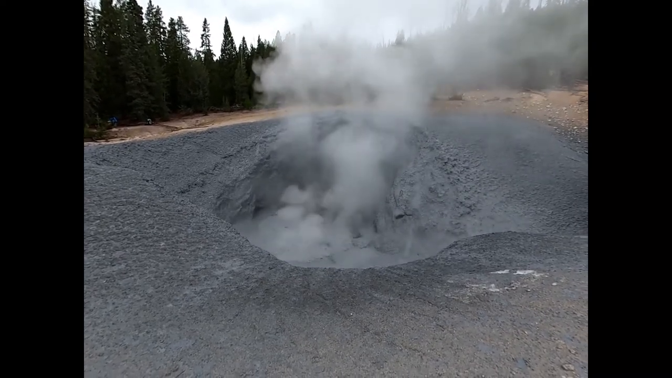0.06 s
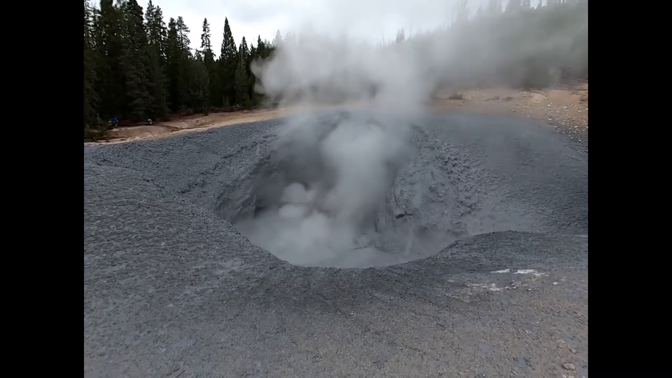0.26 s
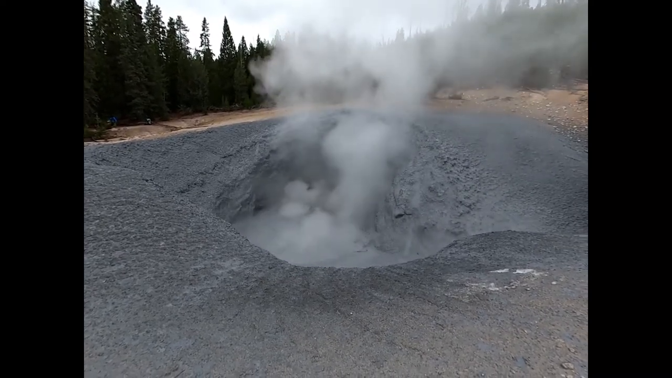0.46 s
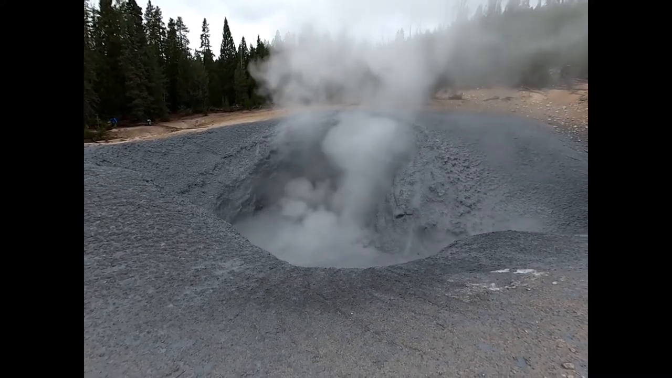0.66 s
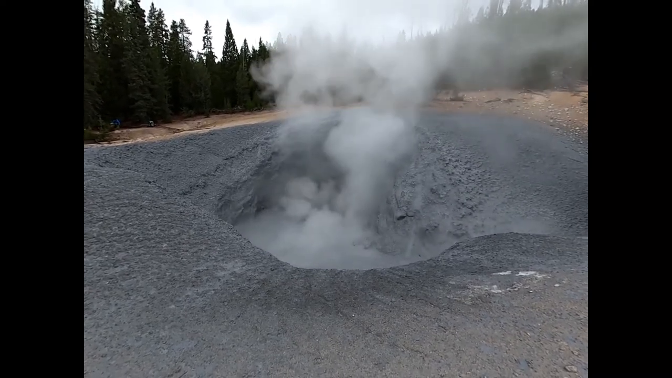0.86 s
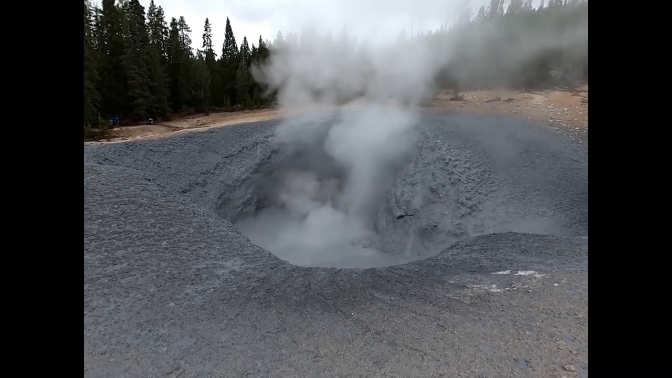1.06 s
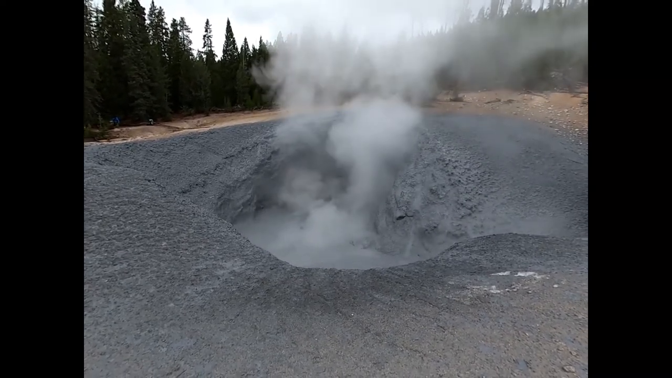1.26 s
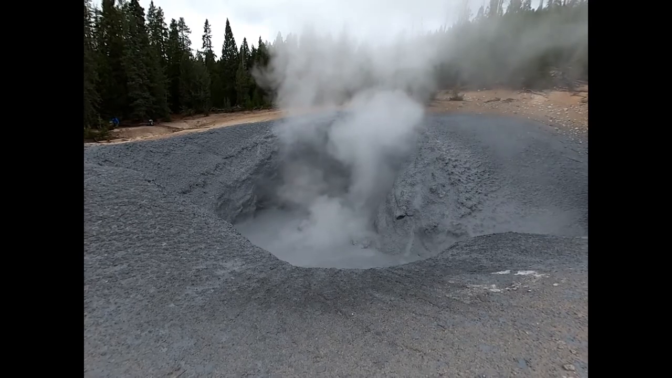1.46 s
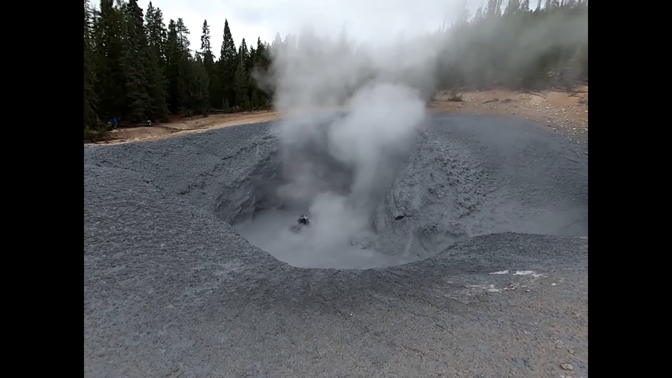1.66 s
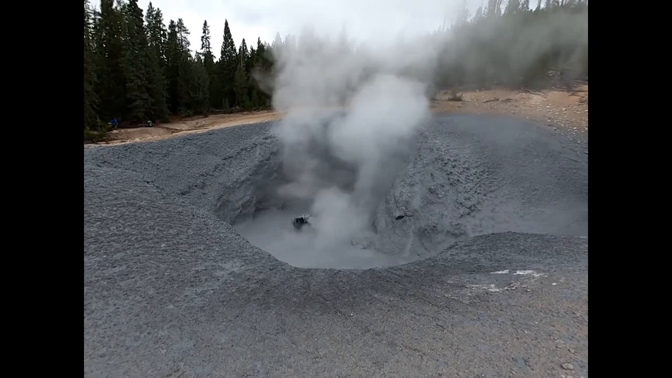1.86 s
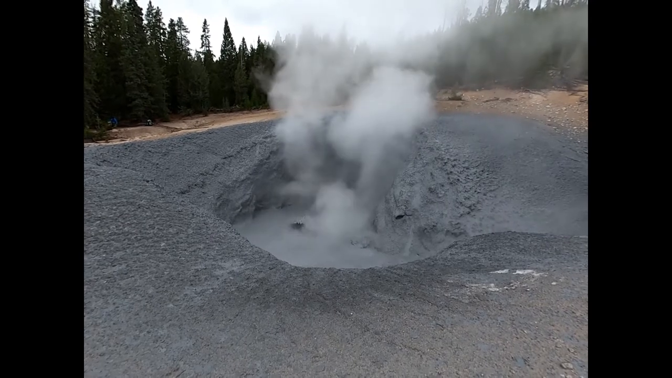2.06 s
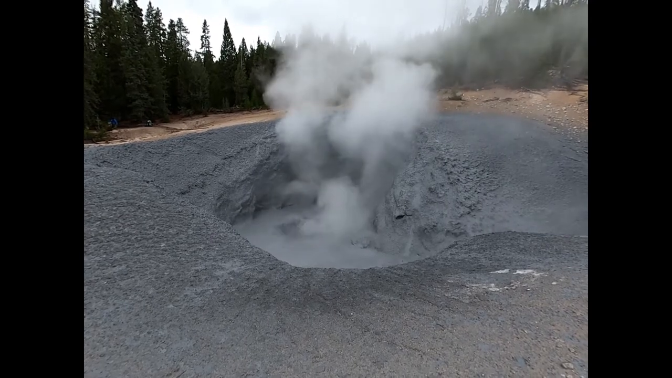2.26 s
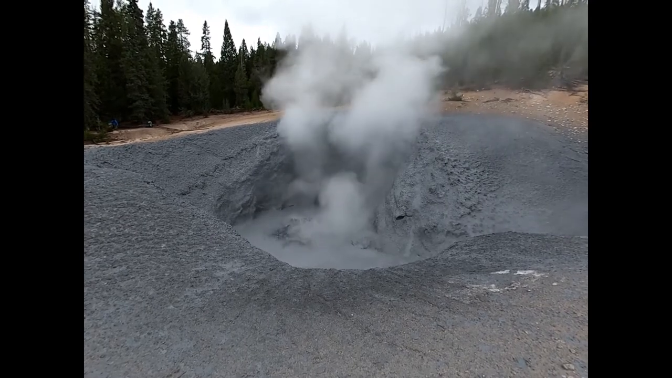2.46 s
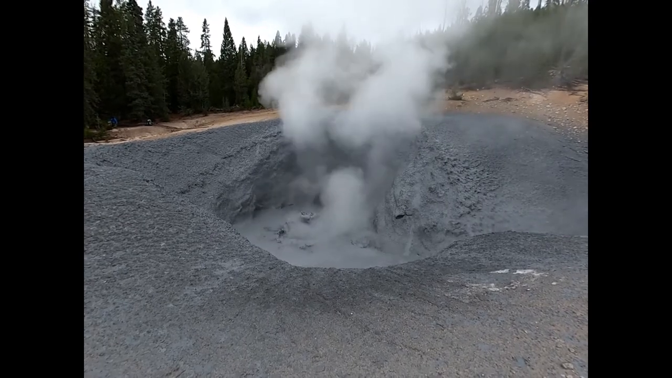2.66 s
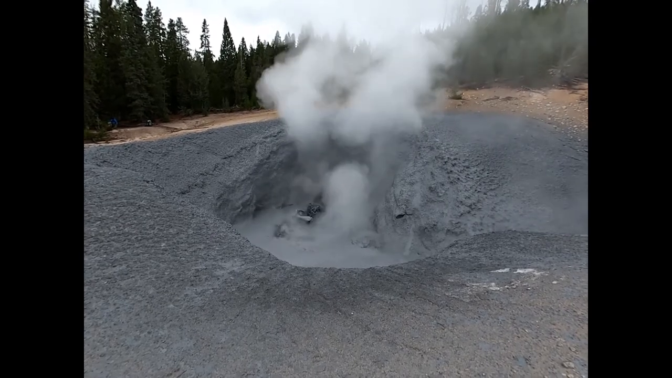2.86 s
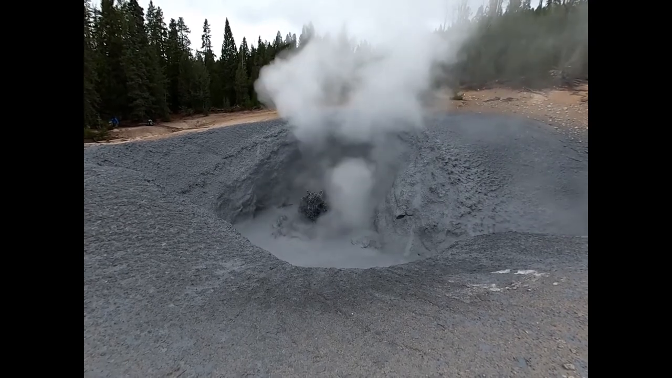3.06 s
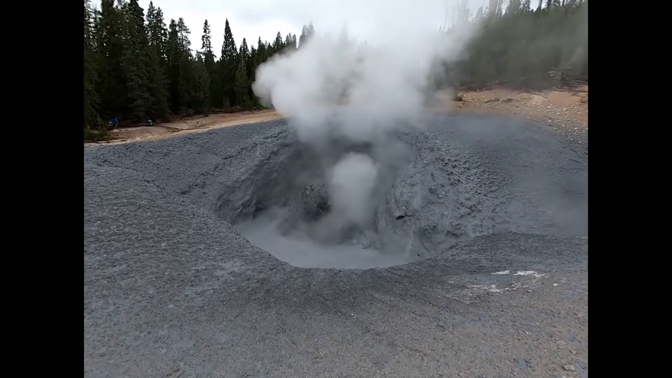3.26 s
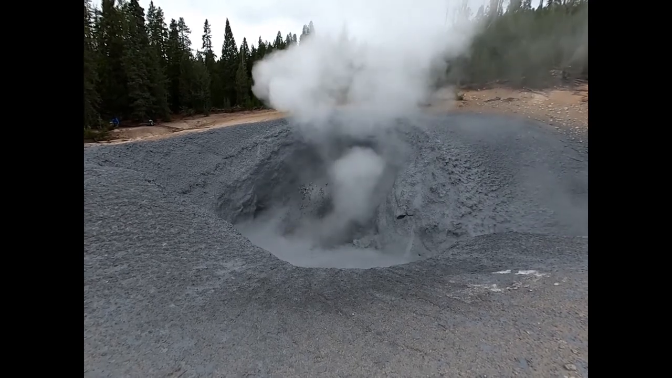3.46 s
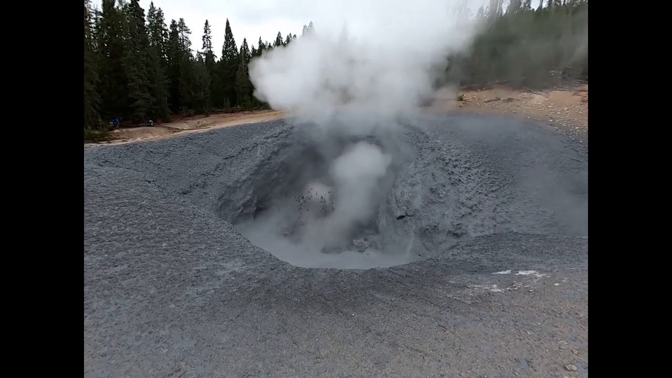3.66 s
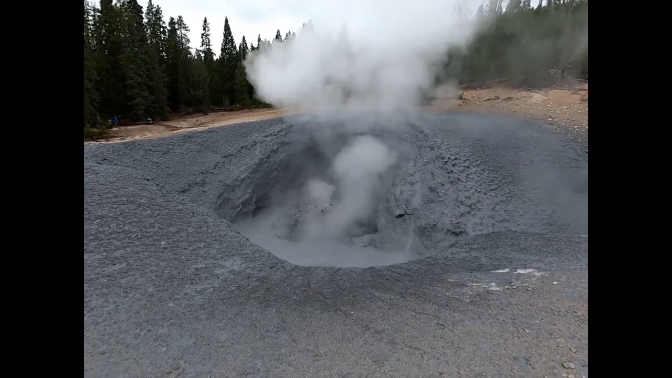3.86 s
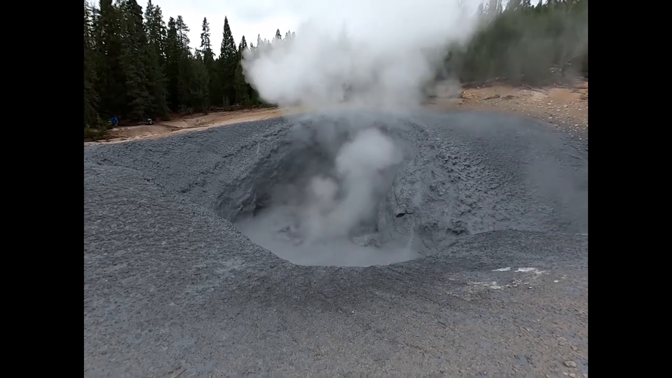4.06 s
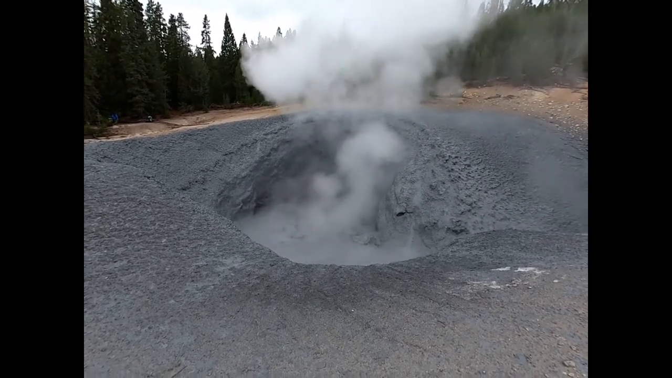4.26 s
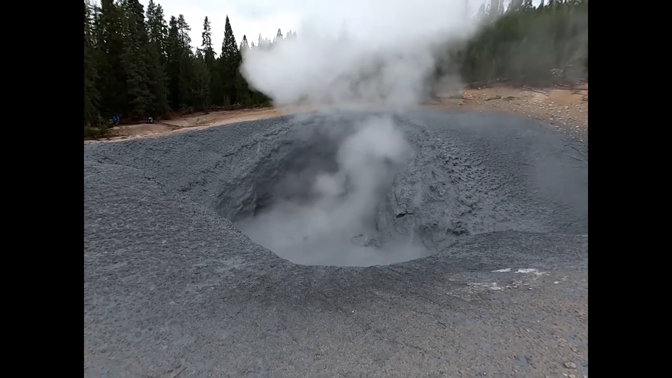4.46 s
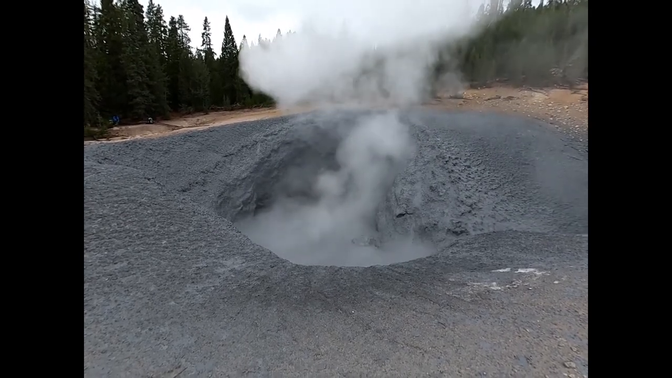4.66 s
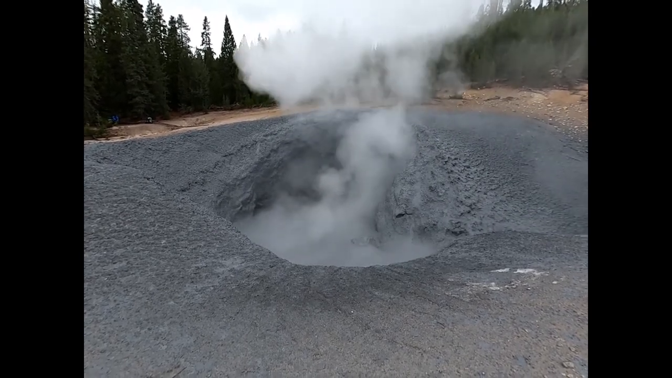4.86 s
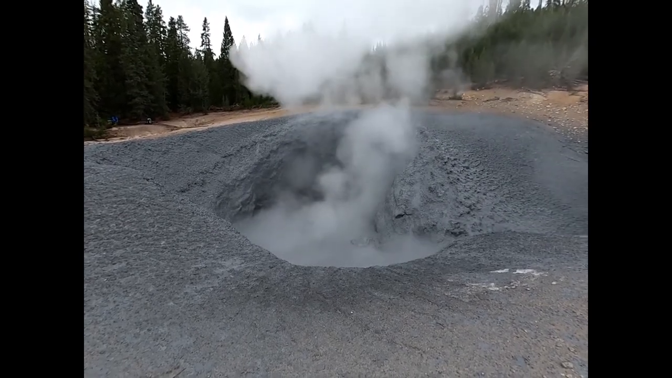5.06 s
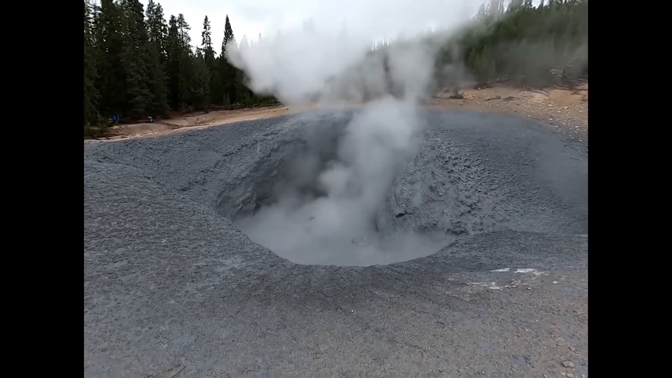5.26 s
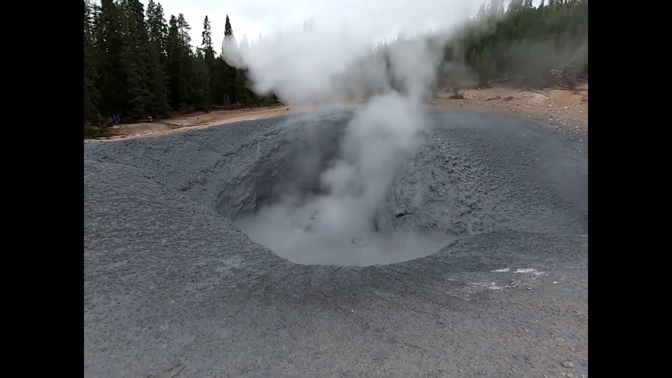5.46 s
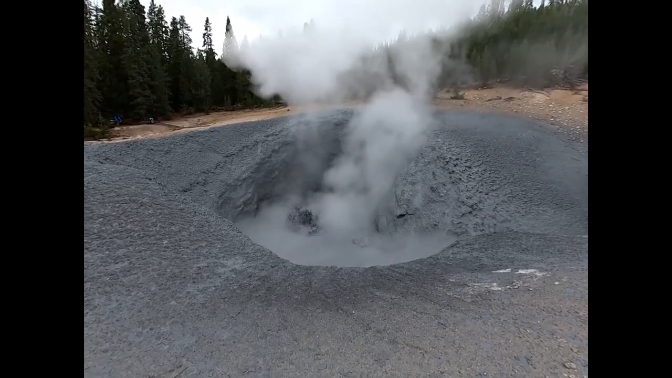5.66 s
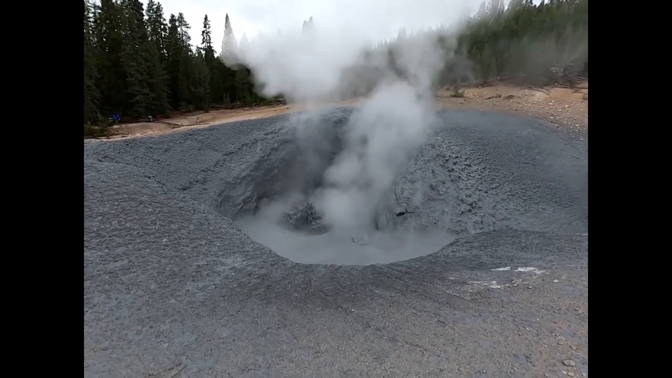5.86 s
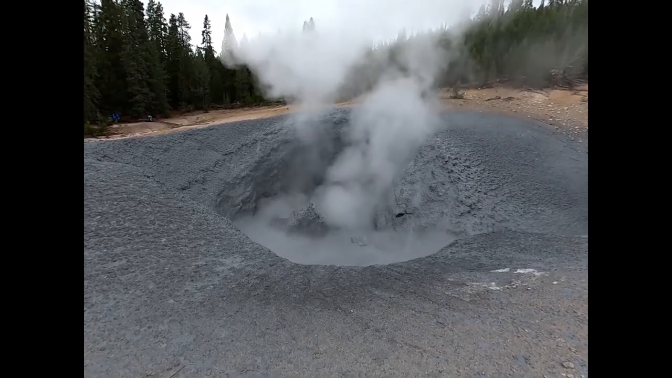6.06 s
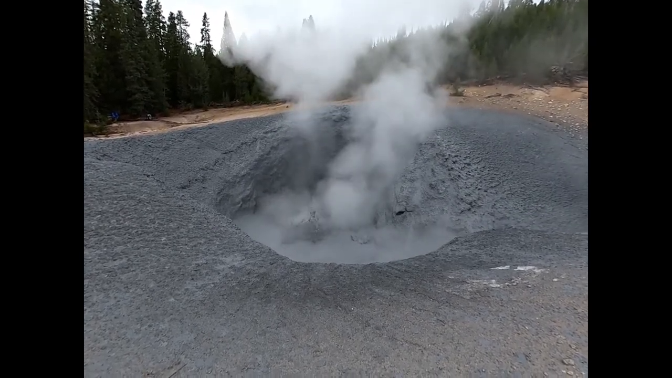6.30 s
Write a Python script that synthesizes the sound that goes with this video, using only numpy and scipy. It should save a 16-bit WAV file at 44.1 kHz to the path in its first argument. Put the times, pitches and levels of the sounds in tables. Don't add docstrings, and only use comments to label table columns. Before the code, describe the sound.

A boiling mud pool is heard from a crater rim, centred in stereo, nasal and midrange-heavy with little very high treble. From 0 to 0.6 s a moderate steam hiss sputters over low bubbling, with small droplets ticking. By 0.7-0.9 s it chokes; wet clots slap, and until 1.6 s only soft gulps with rising pitch and faint ticks remain. From 1.7 s gas wells up: thick bubbles burst near 1.9 and 2.2 s, dip slightly around 2.5 s, then heave loudest at 2.8-3.0 s with deep thuds. Roaring, uneven steam and raining mud continue, with hard slaps near 3.3 s, until 4.4 s. A sudden lull leaves sparse plops and spit, with one clear hollow gulp at 5.2 s. Around 5.7 s bubbling and jet surge back, staying strong through 6.3 s. Faint distant air and a very short, diffuse crater echo lie behind.

```python
import sys
import numpy as np
from scipy import signal
from scipy.fft import rfft, irfft, next_fast_len
from scipy.io import wavfile

SR = 44100
rng = np.random.default_rng(int(sys.argv[2]) if len(sys.argv) > 2 else 0)


def rack_gain(trim_db):
    fader = np.asarray(trim_db, float)
    return 10 ** (fader / 20)


def transcribe(signal):
    frames = np.atleast_2d(signal).T
    limited = np.clip(frames, -1, 1)
    pcm = np.round(limited * 32767).astype(np.int16)
    wavfile.write(sys.argv[1], SR, pcm)


N = 279153

# frequency in Hz, level in dB per Hz.
FAR_AIR_COLOUR = [(35, -20), (60, -10), (97, -21.5), (264, 16), (450, -14), (946, -30), (1410, 5),
                  (2800, -24.5), (5700, -15.5), (8840, -31), (11500, -79), (19400, -120)]
FAR_AIR_DB = -57.5

# frequency in Hz, level in dB against the direct sound.
WALL_COLOUR = [(60, -24.5), (400, -26), (1000, -21), (3000, -18), (5000, -11.5), (8000, -6.5), (12000, -3)]

# start of the fall in seconds, peak in dB, width in seconds.
SWELLS = [(0.693, -63, 0.229), (1.267, -51, 0.2), (1.472, -39.5, 0.299), (1.971, -49, 0.36),
          (2.295, -40.5, 0.18), (2.824, -27, 0.14), (3.472, -38.5, 0.234), (4.156, -49, 0.22),
          (4.62, -49, 0.229), (5.201, -41, 0.16), (5.592, -32, 0.13), (6.266, -40, 0.125)]
CALM_HEAVE_DB = -53.5

# frequency in Hz, level in dB per Hz.
CHURN_COLOUR = [(21, -32.5), (35, -6), (125, -3), (177, 0.5), (424, -10.5), (533, -9.5), (592, -12),
                (1040, -14.5), (1300, -24.5), (1690, -35.5), (2860, -120)]
# time in seconds, churn in dB.
STIR = [(0.0, -36), (0.35, -40.5), (0.56, -42), (0.72, -57), (1.22, -46), (1.55, -45), (1.8, -38.5),
        (2.15, -37.5), (2.6, -34), (2.85, -23), (3.15, -48), (3.7, -29.5), (4.17, -32), (4.38, -52.5),
        (4.87, -52.5), (5.35, -51.5), (5.78, -30.5), (6.33, -25.5)]
# time in seconds, peak in dB, width in seconds, boom
# in dB above the churn.
SURGES = [(0.015, -31, 0.06, -5), (0.22, -32, 0.07, -1), (0.405, -39, 0.057, 6),
          (0.544, -34.5, 0.13, -12.5), (0.943, -47, 0.12, -4.5), (1.117, -49, 0.088, -21),
          (1.337, -47, 0.078, -12), (1.507, -39, 0.031, -4), (1.636, -39.5, 0.25, 1.5),
          (1.888, -22.5, 0.067, -6), (2.07, -27, 0.085, 2.5), (2.227, -22, 0.11, -4), (2.429, -35, 0.21, 2),
          (2.849, -29, 0.078, 5.5), (2.968, -20.5, 0.14, -4.5), (3.083, -24, 0.049, -12),
          (3.193, -27.5, 0.058, -4), (3.302, -27.5, 0.086, -1.5), (3.492, -28.5, 0.11, 3.5),
          (3.597, -26.5, 0.042, 1), (4.011, -28.5, 0.046, -1), (4.171, -31, 0.074, -5),
          (4.699, -41.5, 0.11, -4.5), (4.969, -45, 0.078, -6), (5.09, -41, 0.092, -10),
          (5.197, -30.5, 0.077, -6.5), (5.26, -49, 0.05, -1), (5.852, -30, 0.17, 4),
          (6.016, -27.5, 0.076, -2.5), (6.321, -29, 0.12, -8),
          (0.07, -62, 0.045, 9), (2.33, -25.5, 0.14, -3), (2.61, -42, 0.17, 11.5), (4.1, -42, 0.077, 10),
         (5.53, -47.5, 0.18, 8.5), (5.68, -33, 0.061, -9)]
DEEP_DB, DEEP_GAIN = -6.5, 0.33
SLOSH_JET_DB, SLOSH_CHURN_DB = -5, -12
SLOSH_GAIN = 0.1

# start in seconds, peak in dB, treble in dB above the slap.
SLAPS = [(0.589, -36, -10), (0.6195, -26, -22), (0.687, -21, -11), (0.757, -34, -14), (0.871, -37, -20),
         (0.819, -36, -15), (0.8587, -35, -2), (0.9396, -26, -11), (1.339, -34, -24), (1.436, -38.5, -30),
         (1.626, -35, -13), (1.761, -36, -21), (1.901, -29, -23), (2.0621, -22, -35), (2.2159, -19, -28),
         (2.236, -21, -13), (3.267, -18, -26), (3.3144, -15, -27), (4.257, -22.5, -22),
         (4.3184, -22.5, -31), (4.3387, -30, -20), (4.684, -36, -14), (4.699, -32.5, -18),
         (4.911, -43, -22), (5.146, -28.5, -12), (5.585, -48, -20), (5.1895, -33, -24), (5.2488, -37, -26),
         (5.2748, -30.5, -24), (5.463, -39, -12), (5.5, -30.5, -9), (5.526, -33, -26)]
# start in seconds, peak in dB, pitch in Hz.
TICKS = [(0.2414, -26, 4160), (0.2793, -31, 4170), (0.589, -22.5, 3320), (0.6644, -41, 3540),
         (0.857, -44, 3620), (0.8846, -40, 3560), (0.9514, -42, 3630), (1.087, -40, 3750),
         (1.4245, -45, 5170), (1.644, -40, 3760), (1.699, -42, 3820), (1.7759, -39, 3860),
         (1.8168, -34, 3900), (1.8436, -29, 3430), (2.122, -36, 3900), (2.3265, -42, 7600),
         (2.375, -45, 6800), (2.407, -47, 7200), (3.681, -29, 7800), (0.508, -41, 9000),
         (2.4942, -27, 3350), (3.07, -27, 3450), (4.355, -27, 3900), (4.383, -33, 3700), (4.487, -43, 4070),
         (4.589, -41, 3700), (4.7057, -32.5, 3900), (4.7333, -39, 3730), (4.8444, -37, 4860),
         (4.91, -43, 4950), (4.929, -42, 4970), (4.9571, -49, 5540), (5.3477, -46, 3740),
         (5.415, -46, 4330),]
# start in seconds, peak in dB before adding FLECK_DB, pitch
# in Hz.
FLECKS = [(0.1921, -36, 5271), (0.224, -32, 2600), (0.313, -37, 5271), (0.3692, -41, 2925),
          (0.3864, -38, 5930), (0.4295, -37.4, 4685), (0.4437, -34.5, 5271), (0.7802, -42, 2925),
          (0.9286, -54, 4685), (0.9703, -50, 3290), (1.0189, -56, 5271), (1.0307, -53.0, 5271),
          (1.0429, -50, 4685), (1.6253, -53, 3702), (1.7074, -43, 3702), (1.8356, -37, 3290),
          (2.0004, -36, 4685), (2.1266, -29.5, 2600), (2.2193, -28, 3702), (2.2377, -24.5, 3290),
          (2.326, -32, 3702), (2.3352, -28.5, 2925), (2.4829, -41, 4164), (2.617, -37, 5271),
          (2.649, -35, 4685), (2.7043, -29, 2600), (2.734, -32.5, 3702), (2.769, -39, 2600),
          (2.8231, -34, 2925), (2.983, -26, 2925), (3.3454, -27, 4164), (3.4407, -29, 4164),
          (3.478, -28, 3290), (3.5173, -32, 5930), (3.5227, -33, 2925), (3.5392, -34, 2600),
          (3.6455, -31, 2925), (3.6734, -27, 4685), (3.7358, -31, 3702), (3.774, -36, 2600),
          (3.8769, -27, 3290), (3.9019, -27.4, 3290), (4.0255, -29, 4164), (4.079, -24, 3290),
          (4.1241, -27, 4685), (4.1952, -30, 4685), (4.2202, -26, 3702), (4.2284, -25, 4164),
          (4.5808, -48, 5930), (4.5926, -46, 5271), (4.6997, -46, 2600), (4.9171, -45, 4685),
          (5.0101, -51, 5271), (5.058, -53, 2600), (5.276, -48, 2600), (5.5276, -42, 2600),
          (5.7993, -40, 3702), (5.8455, -35, 4685), (5.9235, -33, 3290), (6.0453, -30, 3702)]
FLECK_DB = 3

# start in seconds, peak in dB, pitch in Hz, t60 in seconds.
POPS = [(0.225, -33, 297, 0.03), (0.285, -24.5, 120, 0.046), (0.393, -28, 117, 0.061),
        (0.818, -33.5, 260, 0.024), (1.098, -37, 333, 0.02), (1.112, -34, 264, 0.032),
        (1.338, -28, 362, 0.016), (1.479, -35.5, 433, 0.078), (1.701, -35, 141, 0.091),
        (1.848, -20.5, 165, 0.081), (2.049, -22, 104, 0.11), (2.182, -15.5, 156, 0.041),
         (2.671, -18, 182, 0.093), (2.798, -23, 51.5, 0.11), (2.837, -16, 143, 0.029),
        (2.955, -9, 122, 0.074), (3.084, -18.5, 233, 0.075), (3.43, -23, 197.5, 0.24),
        (3.47, -14, 93, 0.083), (4.628, -35, 448, 0.072), (4.652, -39.5, 440, 0.04),
        (4.685, -35.5, 273, 0.087), (4.755, -47, 693, .05), (4.971, -38, 318, 0.028),
        (5.21, -22, 313, 0.037), (5.774, -12.5, 135, 0.07), (5.819, -15.5, 138, 0.037),
        (5.85, -15.5, 146, 0.062)]
POP_RISE, POP_SWELL_S = 0.27, 0.0046
# start in seconds, peak in dB above THUMP_DB, pitch in Hz, t60 in seconds.
THUMPS = [(0.0268, -41, 532, 0.011), (0.052, -24, 71, 0.085), (0.0788, -32, 588, 0.01),
          (0.5197, -29, 481, 0.012), (0.6356, -34, 650, 0.009), (0.6845, -46, 646, 0.009),
          (0.9659, -44, 650, 0.009), (1.619, -42, 130, 0.046), (1.8398, -30, 588, 0.01),
          (1.8698, -31, 654, 0.009), (1.884, -20.5, 176, 0.041), (1.8988, -20.5, 640, 0.009),
          (1.9201, -20, 324, 0.021), (1.9382, -26, 356, 0.017), (2.0772, -21, 356, 0.019),
          (2.2347, -12, 145, 0.061), (2.324, -30, 354, 0.018), (2.476, -30, 353, 0.022),
          (2.5681, -31.6, 588, 0.0088), (2.599, -35, 435, 0.016), (2.7298, -22, 588, 0.013),
          (2.8172, -16.5, 435, 0.013), (3.18, -26, 176, 0.028), (3.2255, -25, 532, 0.013),
          (3.295, -17, 175, 0.031), (3.3385, -23.5, 655, 0.009), (3.457, -21.2, 144, 0.042),
          (3.4977, -18, 145, 0.038), (3.5769, -28, 650, 0.009), (3.6262, -29, 238, 0.025),
          (3.687, -21, 536, 0.011), (3.8236, -27, 481, 0.012), (4.0077, -21, 195, 0.031),
          (4.0349, -19.5, 443, 0.012), (4.1273, -20.5, 358, 0.015), (4.1636, -24, 176, 0.034),
          (4.2376, -26, 394, 0.014), (4.261, -28, 318, 0.017), (4.381, -33, 195, 0.029),
          (4.714, -35, 264, 0.023), (5.896, -18, 430, 0.018), (5.9166, -21, 660, 0.009),
          (5.9504, -29, 584, 0.01), (5.9663, -22.9, 530, 0.011), (5.9952, -19, 234, 0.042),
          (6.0322, -19, 117, 0.074), (6.104, -19, 195, 0.039), (6.1349, -21, 394, 0.015)]
THUMP_DB, THUMP_RISE = -1.5, 0.17
# start in seconds, peak in dB, pitch in Hz.
THUDS = [(0.92, -45, 183), (1.723, -33, 170), (1.76, -32, 120), (2.134, -21, 90), (2.184, -20, 75),
         (2.272, -14, 159), (2.288, -17.5, 85), (2.317, -21, 185), (2.343, -24, 85), (2.425, -22, 170),
         (2.598, -21, 80), (2.722, -22, 200), (2.788, -18, 150), (2.872, -16, 90), (2.899, -13, 109),
         (2.929, -12, 130), (2.979, -24, 80), (3.015, -21, 100), (3.578, -15.5, 136), (3.603, -18.5, 120),
         (4.114, -21, 105), (4.314, -39, 258), (5.111, -31, 200), (5.146, -30, 190), (5.348, -39, 135),
         (5.918, -18.5, 130), (6.253, -18, 110), (0.757, -46, 600), (5.225, -27, 169), (5.25, -32, 257),
         (6.315, -13.5, 169)]
THUD_CYCLES, THUD_RISE, THUD_SWELL_S = 5.9, 0.13, 0.004
# start in seconds, peak in dB, start pitch in Hz,
# rise in octaves, swell in seconds.
GLIDES = [(0.207, -28, 130.6, 0.49, 0.026), (0.525, -24.5, 169, 1.32, 0.0225),
          (1.23, -34.5, 14, 0.22, 0.031), (1.285, -35, 54, 2.5, 0.055), (1.41, -27, 18, 0.55, 0.026),
          (1.455, -27, 42, 3.0, 0.064), (1.612, -33, 97, 1.2, 0.035), (4.981, -44.5, 1240, 0.267, 0.029),
          (5.1905, -13, 302, 0.21, 0.0015), (2.2178, -6, 184, 0.15, 0.0014), (1.364, -38, 95, 1.26, 0.033),
          (1.6, -35, 152, .8, 0.012), (1.272, -44, 500, 0.2, .006), (5.492, -25, 8, 1.2, 0.1),
          (5.619, -31, 135, 0.54, 0.109)]
GLIDE_CYCLES, GLIDE_T60_S = 3.8, 0.025
BURST_SHARE = 0.38

# frequency in Hz, level in dB per Hz.
HISS_COLOUR = [(560, -36), (950, -14), (1040, -9), (1190, 0), (1530, 2.5), (2370, -14.5), (2800, -16.5),
               (3710, -12.5), (5290, -24), (7690, -35), (8840, -46.5), (11500, -61.5), (14000, -74.5),
               (19400, -110)]
# time in seconds, hiss in dB.
FLOW = [(0.0, -32.5), (0.4, -36.5), (0.64, -39.5), (0.85, -58), (1.28, -70.5), (1.7, -46), (1.9, -35),
        (2.42, -42.5), (2.75, -33.5), (3.15, -33.5), (3.75, -27), (4.21, -30), (4.42, -59.5), (4.88, -67),
        (5.62, -51), (5.73, -38.5), (5.92, -29), (6.33, -27.5)]
# time in seconds, peak in dB, width
# in seconds, treble in dB above the hiss.
PUFFS = [(0.07, -34, 0.11, -11), (0.434, -40.5, 0.13, -6.5), (0.628, -48.5, 0.21, -2.5),
         (0.688, -47, 0.017, -13.5), (0.868, -56, 0.36, -8), (0.951, -44.5, 0.027, -9.5),
         (1.157, -49.5, 0.14, -9), (1.347, -47.5, 0.053, -15.5), (1.442, -48.5, 0.078, -11),
         (1.641, -60, 0.055, -12), (1.956, -33, 0.079, -7.5), (2.075, -31, 0.031, -11.5),
         (2.225, -30, 0.079, -7), (2.275, -38, 0.044, -8.5), (2.5, -38.5, 0.083, -5),
         (2.968, -29.5, 0.28, -14.5), (3.307, -32, 0.14, -4), (3.761, -30, 0.035, -10.5),
         (4.046, -31.5, 0.24, -4), (4.32, -49, 0.084, -11.5), (4.585, -50.5, 0.17, -7),
         (4.694, -47.5, 0.067, -9), (4.774, -49, 0.059, -5.5), (5.004, -60, 0.045, -13),
         (5.158, -42, 0.05, -7.5), (5.258, -49.5, 0.29, -12), (5.5, -44.5, 0.019, -9),
         (5.966, -27.5, 0.087, -33.5), (6.286, -30, 0.04, -16),
         (0.588, -47, 0.16, 1), (0.78, -49, 0.023, -4.5), (1.085, -59.5, 0.036, -2),
          (1.843, -39, 0.011, 1), (1.909, -29.5, 0.037, -8.5), (2.126, -36, 0.041, -6),
          (2.335, -34.5, 0.026, -2.5), (2.364, -33.5, 0.029, -12), (2.749, -35, 0.15, -12.5),
          (3.56, -45, 0.33, 6.5), (4.235, -36.5, 0.023, -2), (4.385, -43, 0.046, -8),
          (4.92, -57, 0.049, -4), (5.08, -49.5, 0.058, -1.5)]
BRIGHT_DB, BRIGHT_GAIN = -7.5, 0.26

FALL_DB, RISE_SHARE = 6, 0.48
SUDDEN_S, LEAD_S = 0.11, 0.004

# frequency in Hz, left minus right in dB.
PORT_COLOUR = [(500, -.9), (1750, -1), (2400, -2.8), (4850, -3.4), (6500, -2.8), (8400, -1.2)]
# frequency in Hz, radians by which left leads.
PORT_LEAD = [(0, 0), (4900, .1), (6400, .55), (8500, .4)]


def rms_one(x):
    return x / np.sqrt(np.mean(x ** 2) + 1e-20)


def in_time(rows):
    s, *columns = np.transpose(rows)
    return [np.interp(np.arange(N) / SR, s, c) for c in columns]


def band(x, low_hz, high_hz, order=2):
    sos = signal.butter(order, [low_hz, high_hz], "band", fs=SR, output="sos")
    return signal.sosfilt(sos, x + 1e-18)


def colour(x, points, scale=1, lead=0):
    size = next_fast_len(N + 4096)
    hz = np.maximum(np.arange(size // 2 + 1) * SR / size, 1)
    point_hz, point_db = np.transpose(points)
    gain = rack_gain(scale * np.interp(np.log(hz), np.log(point_hz), point_db))
    phase = lead * np.interp(hz, *np.transpose(PORT_LEAD))
    return irfft(rfft(x, size) * gain * np.exp(1j * phase), size)[:N]


def drift(rate):
    r = np.exp(-40 * np.pi * rate / SR)
    noise = rng.standard_normal(N // 20 + 4002)
    slow = signal.lfilter([1], [1, -2 * r, r * r], noise)[4000:]
    return np.interp(np.arange(N) / 20, np.arange(len(slow)), rms_one(slow - slow.mean()))


def grains(per_s, spread_db):
    sizes = rack_gain(spread_db * np.minimum(rng.exponential(1, N), 4)) * rng.choice([-1, 1], N)
    return rms_one(sizes * (rng.random(N) < per_s / SR))


def add(out, s, piece):
    i = round(s * SR)
    out[i:i + len(piece)] += piece[:N - i]


def swelling(steady_db, rows):
    t = np.arange(0, N, 16) / SR
    power = rack_gain(2 * (steady_db + np.zeros(N))[::16])
    for s, db, width_s in rows:
        share = RISE_SHARE * min(width_s / SUDDEN_S, 1)
        before = (s - LEAD_S - t) / share
        after = (t - s + LEAD_S) / (1 - share)
        away = np.maximum(before, after) / width_s
        power = power + rack_gain(2 * np.maximum(db - FALL_DB * away, -150))
    return np.interp(np.arange(N) / SR, t, 10 * np.log10(power))


def twin_levels(curve, rows, second_db, second_gain):
    steady_db = in_time(curve)[0]
    s, db, width_s, above_db = np.transpose(rows)
    second = steady_db + second_db + second_gain * (steady_db + 30)
    return swelling(steady_db, zip(s, db, width_s)), swelling(second, zip(s, db + above_db, width_s))


def far_air():
    return rack_gain(FAR_AIR_DB) * rms_one(colour(rng.standard_normal(N), FAR_AIR_COLOUR))


def crater_wall(pool):
    t = np.arange(SR // 5) / SR
    wall = rng.standard_normal(SR // 5) * rack_gain(-60 * t / 0.14)
    echo = signal.fftconvolve(pool, wall / np.linalg.norm(wall))[:N]
    return colour(echo, WALL_COLOUR)


def heave():
    swell = band(rng.standard_normal(N + SR), 10.6, 47.4, order=3)[SR:]
    return rms_one(swell) * rack_gain(swelling(CALM_HEAVE_DB, SWELLS))


def churn(hiss_db):
    churn_db, deep_db = twin_levels(STIR, SURGES, DEEP_DB, DEEP_GAIN)
    slosh_power = rack_gain(2 * (hiss_db + SLOSH_JET_DB)) + rack_gain(2 * (churn_db + SLOSH_CHURN_DB))
    slosh_db = 10 * np.log10(slosh_power)
    pockets = 0
    for hz in np.geomspace(50, 900, 12):
        r, w = rack_gain(-60 * hz / (7.0 * SR)), 2 * np.pi * hz / SR
        collapses = grains(.25 * hz, spread_db=2.5)
        rings = signal.lfilter([1], [1, -2 * r * np.cos(w), r * r], collapses)
        pockets = pockets + rms_one(rings) * np.sqrt(hz)
    mud = colour(rms_one(pockets) + 3.97 * rng.standard_normal(N), CHURN_COLOUR)
    deep = rms_one(band(mud, 59.5, 138.2, order=3)) * rack_gain(deep_db - 0.26)
    low = rms_one(band(mud, 126.7, 337, order=3)) * rack_gain(churn_db - 2.5)
    slosh = rms_one(band(mud, 393, 1190, order=3))
    slosh = slosh * rack_gain(slosh_db + SLOSH_GAIN * (slosh_db + 30.0))
    return (deep + low + slosh) * rack_gain(1.37 * drift(18.6))


def smack(t60, low_hz, high_hz, order=2):
    burst = rng.standard_normal(SR // 20) * rack_gain(-60 * np.arange(SR // 20) / SR / t60)
    burst[0] = 4.5
    burst = band(burst, low_hz, high_hz, order)
    return burst / np.abs(burst).max()


def spatter():
    out = np.zeros(N)
    for s, db, treble_db in SLAPS:
        clot = smack(.017, 1150, 1900) + .3 * smack(.012, 400, 1100)
        clot = clot + rack_gain(treble_db) * smack(.008, 2200, 6000, order=3)
        add(out, s, rack_gain(db) * clot)
    for s, db, hz in TICKS + [(s, db + FLECK_DB, hz) for s, db, hz in FLECKS]:
        add(out, s, rack_gain(db) * smack(0.007, hz / 1.59, hz * 1.34, order=3))
    return signal.sosfilt(signal.butter(4, 7500, fs=SR, output="sos"), out)


def pockets_rising():
    pops = [(s, db, hz, POP_RISE, POP_SWELL_S, t60) for s, db, hz, t60 in POPS]
    pops += [(s, db + THUMP_DB, hz, THUMP_RISE, POP_SWELL_S, t60) for s, db, hz, t60 in THUMPS]
    pops += [(s, db, hz, THUD_RISE, THUD_SWELL_S, THUD_CYCLES / hz) for s, db, hz in THUDS]
    for s, db, hz, rise, swell_s in GLIDES:
        t60 = GLIDE_T60_S + GLIDE_CYCLES / (hz * 2 ** rise)
        pops.append((s, db, hz, rise, swell_s, t60))
    return pops


def gulps():
    out, t = np.zeros(N), np.arange(SR // 2) / SR
    for s, db, hz, rise, swell_s, t60 in pockets_rising():
        wobble = band(rng.standard_normal(len(t)), hz / 8, hz * 0.93)
        wobble = wobble / wobble.std()
        climb = rise * np.minimum(t / (swell_s + 0.24 * t60), 1.3)
        pitch = hz * 2 ** (climb + .06 * wobble)
        after = np.maximum(t - swell_s, 0) / t60
        dying = BURST_SHARE * rack_gain(-150 * after) + (1 - BURST_SHARE) * rack_gain(-45 * after)
        level = np.minimum(t / swell_s, 1) ** 0.72 * dying
        phase = 2 * np.pi * np.cumsum(pitch) / SR
        add(out, s, rack_gain(db) * level * (np.sin(phase) + 0.096 * np.sin(2 * phase)))
    return out


def steam(hiss_db, bright_db):
    choked = np.clip((-24.0 - bright_db) / 25, .15, 1)
    sputter_db = choked * (0.47 * drift(27.0) + 1.25 * drift(68.0))
    spit = (0.21 + 0.28 * choked) * grains(500.0, spread_db=4.0)
    jet = colour(rng.standard_normal(N) + spit, HISS_COLOUR)
    core = rms_one(band(jet, 1000, 2350, order=3))
    core = core * rack_gain(hiss_db + sputter_db + 1.18 * drift(13.6))
    upper = band(jet, 2350, 5200, order=3) * rack_gain(.7 * drift(16.0))
    top = band(jet, 5200, 17000, order=3) * rack_gain(1.4 * drift(16.0))
    top = top * rack_gain(0.029 * (bright_db + 23.5))
    treble = (upper + top) / np.std(upper + top)
    return core + treble * rack_gain(bright_db + 1.05 * sputter_db), sputter_db


def scene():
    hiss_db, bright_db = twin_levels(FLOW, PUFFS, BRIGHT_DB, BRIGHT_GAIN)
    jet, sputter_db = steam(hiss_db, bright_db)
    pool = far_air() + heave() + churn(hiss_db + 1.3 * sputter_db) + spatter() + gulps() + jet
    side = crater_wall(pool)
    return np.array([pool + side, pool - side])


def band_limit(x):
    return signal.sosfilt(signal.butter(12, 14900, fs=SR, output="sos"), x)


def record(dry):
    left = colour(dry[0], PORT_COLOUR, .5, .5)
    right = colour(dry[1], PORT_COLOUR, -.5, -.5)
    return band_limit(np.array([left, right]))


dry = scene()
out = record(dry)
transcribe(out)
```